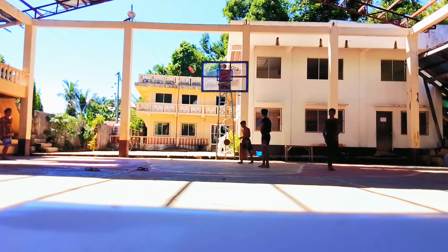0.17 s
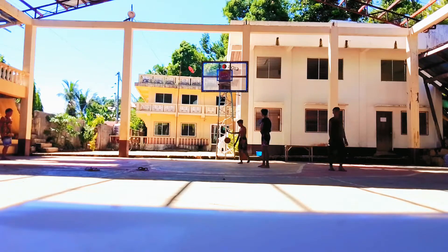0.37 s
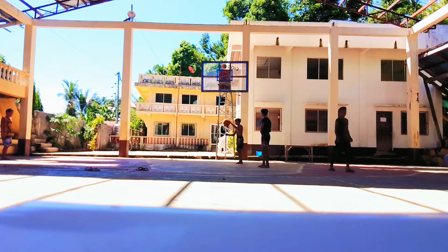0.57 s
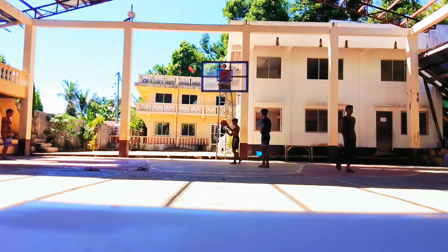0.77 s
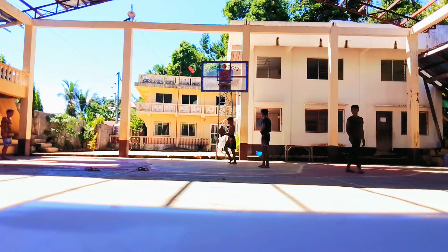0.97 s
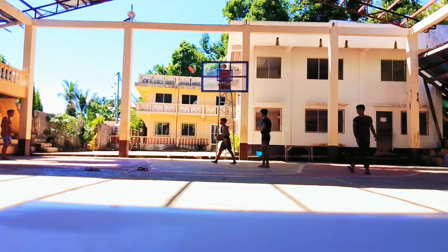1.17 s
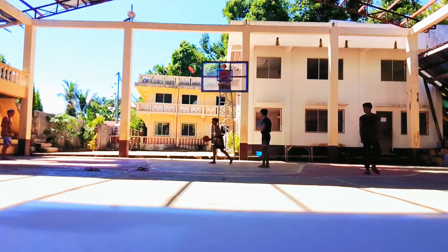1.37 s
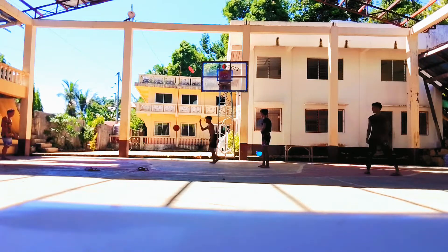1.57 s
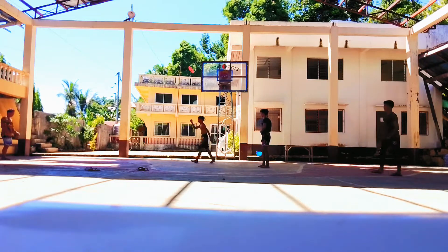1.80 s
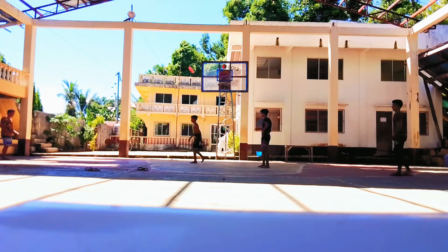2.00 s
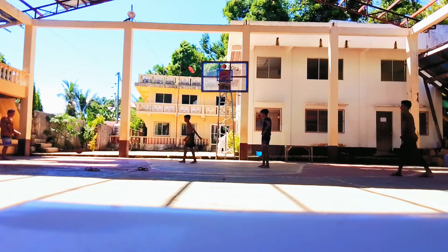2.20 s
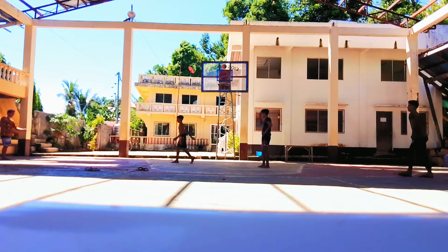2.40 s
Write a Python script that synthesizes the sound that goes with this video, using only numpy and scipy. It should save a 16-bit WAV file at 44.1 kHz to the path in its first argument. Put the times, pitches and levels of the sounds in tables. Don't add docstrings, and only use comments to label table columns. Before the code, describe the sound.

A basketball bounces on concrete. A quiet yard with a faint throbbing insect, a fading earlier ring and tiny sole taps opens; at 0.2 s comes a hard slap, deep thump and hollow airy ring, with quick echoes and a long tail. Gritty soles scuff near 0.8 and 1.4 s, fainter until 2.0. A softer, duller bounce lands at 2.1 s and reverberates. Distant phone microphone, mono.

```python
import sys
import numpy as np
from scipy import signal
from scipy.fft import rfft, irfft
from scipy.io import wavfile
from scipy.ndimage import uniform_filter1d

SR = 44100
rng = np.random.default_rng(int(sys.argv[2]) if len(sys.argv) > 2 else 0)


def generate_wav(sig):
    pcm = np.round(np.clip(np.atleast_2d(sig).T, -1, 1) * 32767).astype(np.int16)
    wavfile.write(sys.argv[1], SR, pcm)


def volts_from_db(level):
    exponent = np.asarray(level, float) / 20
    return 10 ** exponent


N = 108045
T = np.arange(N) / SR

# start in seconds, level in dB, slap in dB, ring in dB, slap length in seconds.
BOUNCES = [
    (.2006, -8, 8, 2, .00026),
    (2.0843, -18, 3, 4.5, .00034),
]
# lag in seconds, thump in dB, treble in dB.
ECHOES = [
    [(.0215, -18, -24), (.0284, -12, -11), (.0305, -2, -18), (.0385, -3, -19), (.0465, -8, -22),
     (.078, -7, -19), (.086, -9, -19), (.135, -9, -21)],
    [(.019, -10, -11), (.027, -1, -15), (.031, -10, -8), (.041, -6, -11), (.089, -9, -16), (.14, -5, -16)],
]
# thump in dB, ring in dB, spray in dB.
TAIL_SENDS = [
    (8.5, 4, 9.5),
    (9.5, 3.5, -9),
]
# frequency in Hz, level in dB, 60 dB decay in seconds.
AIR_MODES = [(274.3, -12.5, 0.084), (412, -10, 0.085), (707, -15, 0.056), (1122.4, -2.5, 0.057),
             (1374, 0.5, 0.015), (1682, 1, 0.024), (1900, 5, 0.019), (2230, -3, 0.026), (2774, -3.5, 0.021),
             (3600, -1.5, 0.018), (4060, -16.5, 0.049), (5500, -17, 0.014)]
# frequency in Hz, density in dB per Hz.
CRACK = [(500, -8), (3000, 0), (6500, -2), (8000, -11), (9500, -5), (12000, -11), (15500, -24)]
# frequency in Hz, density in dB per Hz.
SPRAY = [(500, -1), (1500, -8), (2500, 14), (4000, -1.5), (6500, -11.5), (9500, -14), (12000, -20.5),
         (15500, -20)]
# frequency in Hz, level in dB, 60 dB decay in seconds.
COURT = [(50, -21.5, 1.07), (137, -1, 1.34), (270, -2.5, 1.34), (443, 6, 1.49), (603, -0.5, 1.89),
         (1090, 9, 1.48), (2200, 1, 1.33), (4570, -1.5, 1.39), (9100, 0.5, 1.09), (15300, -22, 1.1)]
# start in seconds, rise in seconds, drag in seconds, level in dB, sole resonance in Hz.
SCUFFS = [
    (0.823, 0.056, 0.19, -43, 2200),
    (1.363, 0.041, 0.12, -42, 2410),
    (1.52, 0.01, 0.28, -62, 2200),
    (1.79, 0.018, 0.18, -60.5, 2390),
    (1.879, 0.01, .06, -55, 2240),
    (2.032, 0.065, 0.22, -49, 2700),
    (.085, 0.012, 0.022, -71, 1900),
    (1.1, 0.042, 0.14, -57.5, 1900),
]
# frequency in Hz, density in dB per Hz.
GRIT = [(300, -38), (900, -20.5), (1500, -17.5), (3500, -14.5), (6500, -25.5), (8000, -27.5), (11000, -38),
        (15500, -47)]
# start in seconds, level in dB.
TICKS = [
    (.0942, -32),
    (.018, -41),
    (.839, -38),
    (.862, -34),
]
# frequency in Hz, density in dB per Hz.
YARD = [(25, 15), (70, 4.5), (200, -3.5), (1000, -10.5), (2100, -9.5), (4000, -18.5), (6500, -35),
        (8000, -33), (15000, -70)]
# frequency in Hz, density in dB per Hz.
EARLIER = [(200, 0), (700, 6.5), (1700, 1.5), (3000, -22), (6000, -42)]


def colour(x, table):
    hz, db = np.array(table)[:, :2].T
    f = np.arange(len(x) // 2 + 1) * SR / len(x) + 1
    return irfft(rfft(x) * volts_from_db(np.interp(np.log(f), np.log(hz), db)), len(x))


def unit(x):
    return x / np.sqrt(np.mean(x ** 2))


def walk(rate):
    k = int(SR / rate)
    steps = np.repeat(rng.standard_normal(N // k + 1), k)
    return 1.3 * uniform_filter1d(uniform_filter1d(steps, k), k)[:N]


def resonate(x, hz, width_hz):
    return signal.lfilter(*signal.iirpeak(hz, hz / width_hz, SR), x)


def add(out, at_s, x):
    i = int(round(at_s * SR))
    out[i:i + len(x)] += x[:N - i]


def pulse(t, at, wide, slap_s):
    return np.exp(-((t - at) / wide * 3) ** 2) * slap_s / wide


def thump_of_squash(t, lift_s):
    squash_s, settle_s, rebound_s, rebound_db = .0106, .0018, .0012, -1
    swing = np.sin(2 * np.pi * np.minimum(t / squash_s, 1)) * (1 - np.exp(-t / settle_s))
    after = np.clip(t - lift_s, 0, 1) / rebound_s
    return swing + volts_from_db(rebound_db) * after ** 2 * np.exp(1 - after ** 2)


def ring_of_air(t, lift_s, slap_s):
    lift_db, lift_soft = 0, 1.7
    ring = sum(volts_from_db(db - 60 * t / t60) * np.cos(2 * np.pi * hz * t) for hz, db, t60 in AIR_MODES)
    strike = volts_from_db(lift_db) * pulse(t, lift_s, lift_soft * slap_s, slap_s) - pulse(t, slap_s, slap_s, slap_s)
    ring = signal.fftconvolve(strike, ring)[:len(t)]
    return ring / abs(ring).max()


def ball(slap_db, ring_db, slap_s):
    t = T[:SR // 5]
    lift_s, crack_t60_s, crack_db = .0093, .022, -34
    thump = thump_of_squash(t, lift_s)
    slap = volts_from_db(slap_db) * pulse(t, slap_s, slap_s, slap_s) / 2
    high = volts_from_db(ring_db) * ring_of_air(t, lift_s, slap_s) - slap
    click = 1. * (abs(t - slap_s) < .5 / SR)
    snap = colour(click, SPRAY) * (t < lift_s)
    crack = unit(colour(rng.standard_normal(len(t)), CRACK))
    crack = volts_from_db(slap_db + crack_db - 60 * t / crack_t60_s) * crack
    return thump, high, -snap / snap.max(), crack


def bounces():
    snap_db, scatter_s, scatter_db = -24, .004, -13
    out, t = np.zeros(N), T[:SR // 50]
    for (at, db, slap_db, ring_db, slap_s), echoes, sends in zip(BOUNCES, ECHOES, TAIL_SENDS):
        thump_send_db, ring_send_db, spray_send_db = sends
        thump, high, snap, crack = ball(slap_db, ring_db, slap_s)
        near = high + volts_from_db(slap_db + snap_db) * snap
        add(out, at - slap_s / 2, volts_from_db(db) * (thump + near + crack))
        for lag, low_db, high_db in echoes:
            wall = (t == 0) + volts_from_db(scatter_db) * np.exp(-t / scatter_s) * rng.standard_normal(len(t))
            treble = np.convolve(near, wall)[:len(thump)]
            add(out, at + lag, volts_from_db(db) * (volts_from_db(low_db) * thump + volts_from_db(high_db) * treble))
        fed = volts_from_db(thump_send_db) * thump + volts_from_db(ring_send_db) * high
        add(out, at, volts_from_db(db + spray_send_db) * signal.fftconvolve(snap, court())[:N])
        add(out, at, volts_from_db(db) * signal.fftconvolve(fed, court())[:N])
    return out


def court():
    gap_s, build_s = .021, .018
    hz, db, t60 = np.array(COURT).T
    spectrum = rfft(rng.standard_normal(N))
    f = np.arange(N // 2 + 1) * SR / N + 1
    out = 0
    for centre in 40 * 2 ** np.arange(0, 9, .5):
        band = irfft(spectrum * np.clip(1 - 2 * abs(np.log2(f / centre)), 0, 1), N)
        level_db = np.interp(np.log(centre), np.log(hz), db)
        decay_s = np.interp(np.log(centre), np.log(hz), t60)
        out = out + band * volts_from_db(level_db - 60 * T / decay_s)
    late = np.clip(T - gap_s, 0, 9)
    return out * (1 - np.exp(-late / build_s)) / np.sqrt(.09 * SR)


def scuffs():
    grains_per_s, scatter_db, sole_width_hz, sole_db = 5600, 0.5, 1400, -1
    tick_hz, tick_t60_s, wet_db = 1900, 0.007, -2.5
    out = np.zeros(N)
    for at, rise, drag, db, hz in SCUFFS:
        chance, size, noise = rng.random(N), rng.exponential(size=N), rng.standard_normal(N)
        grains = (chance < grains_per_s / SR) * volts_from_db(scatter_db * size) * np.sign(noise)
        grains = grains + 0.28 * noise
        sole = resonate(resonate(grains, hz, sole_width_hz), hz, sole_width_hz)
        fade = np.exp(-(np.clip(T - at - rise, 0, 9) / drag) ** 2)
        push = np.clip((T - at) / rise, 0, 1) * fade
        rubbing = volts_from_db(sole_db) * unit(sole) + unit(colour(grains, GRIT))
        out += volts_from_db(db + 0.3 * walk(35)) * push * rubbing
    t = T[:SR // 40]
    for at, db in TICKS:
        add(out, at, -volts_from_db(db - 60 * t / tick_t60_s) * np.sin(2 * np.pi * tick_hz * t))
    return out + volts_from_db(wet_db) * signal.fftconvolve(out, court())[:N]


def insect():
    hz, width_hz, throb_hz, level_db, end_s = 5600, 250, 55, -76, .6
    chirr = unit(resonate(rng.standard_normal(N), hz, width_hz))
    throb = 1 + 0.89 * np.sin(2 * np.pi * throb_hz * T + walk(15))
    return volts_from_db(level_db) * chirr * throb * np.clip((end_s - T) / .3, 0, 1)


def yard():
    wash_db, earlier_db, earlier_s = -47.5, -51.5, 0.26
    swell = volts_from_db(wash_db + .8 * walk(2) + 1.2 * walk(20))
    wash = swell * unit(colour(rng.standard_normal(N), YARD))
    earlier = np.exp(-T / earlier_s) * unit(colour(rng.standard_normal(N), EARLIER))
    return wash + volts_from_db(earlier_db) * earlier + insect()


def scene():
    return (bounces() + scuffs() + yard())[None]


def roll_off(x):
    return signal.sosfilt(signal.butter(12, 16670, fs=SR, output="sos"), x)


def record(dry):
    low_hz, top_hz, offset, drift = 56, 15500, .0279, .0005
    port_hz, port_width_hz, port_gain = 8120, 560, 1
    heard = signal.sosfilt(signal.butter(3, low_hz, "high", fs=SR, output="sos"), dry)
    heard = heard + port_gain * resonate(heard, port_hz, port_width_hz)
    heard = signal.sosfilt(signal.ellip(8, .2, 70, top_hz, fs=SR, output="sos"), heard)
    mix = np.clip(heard + offset + drift * walk(3), -.99, .99)
    return roll_off(mix)


dry = scene()
out = record(dry)
generate_wav(out)
```